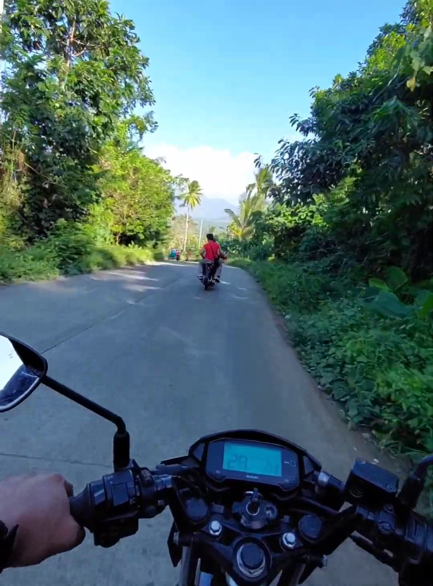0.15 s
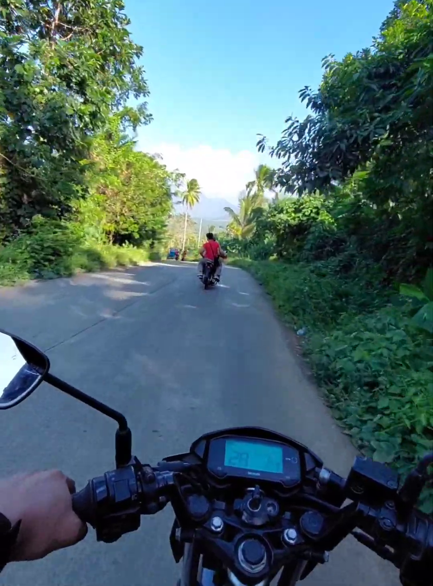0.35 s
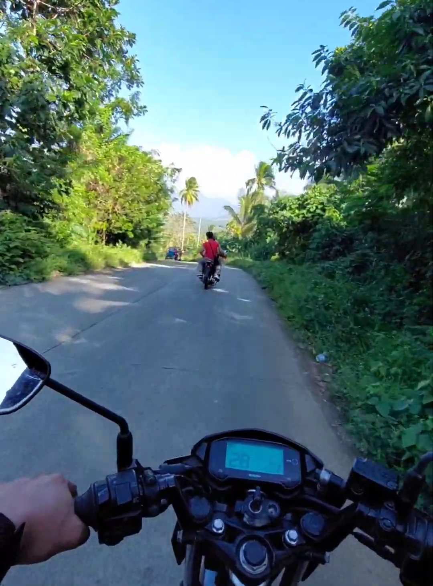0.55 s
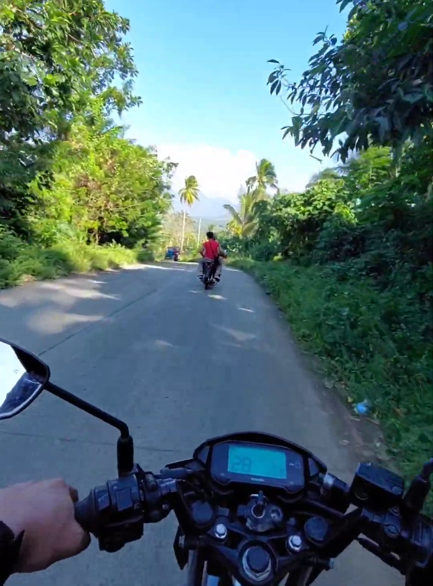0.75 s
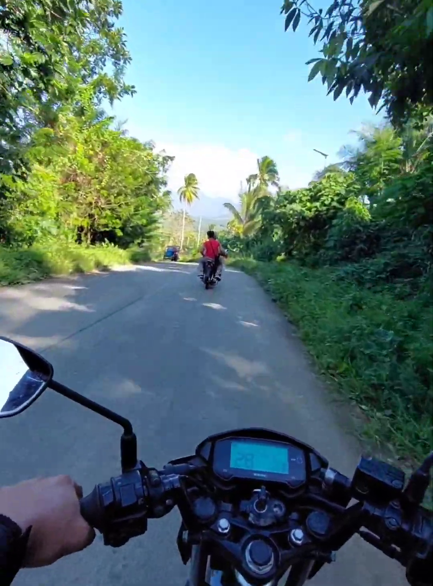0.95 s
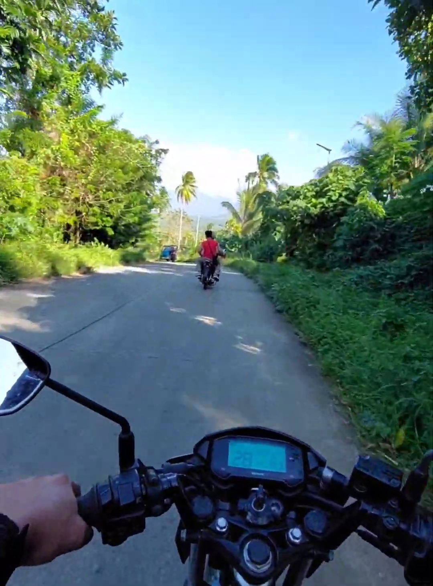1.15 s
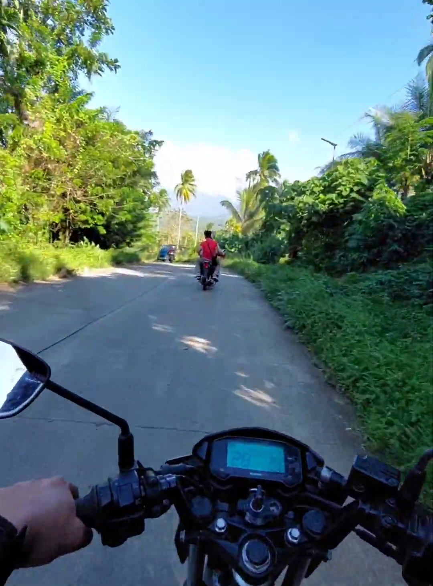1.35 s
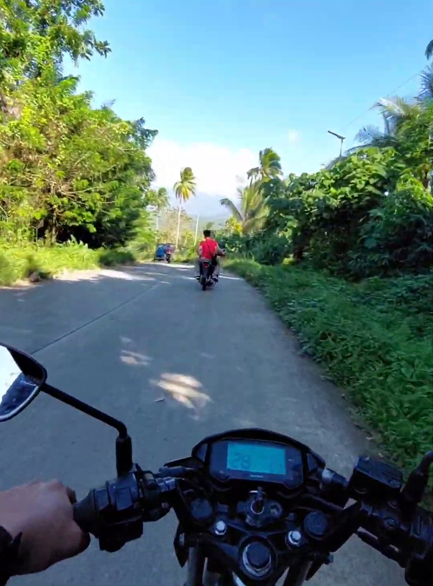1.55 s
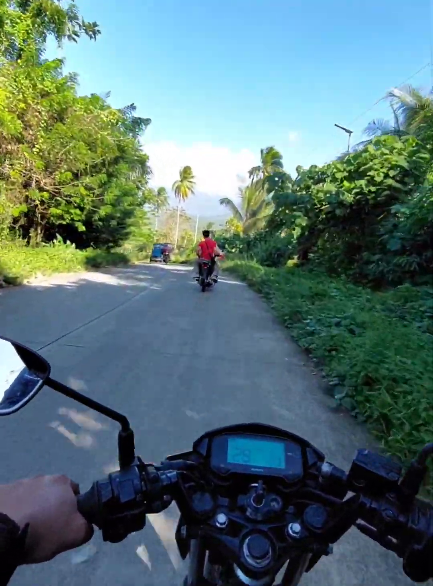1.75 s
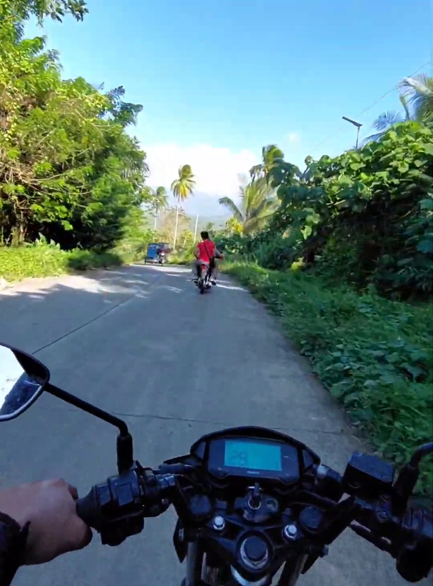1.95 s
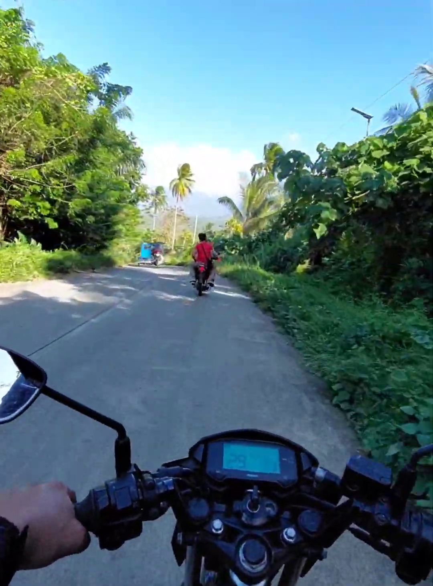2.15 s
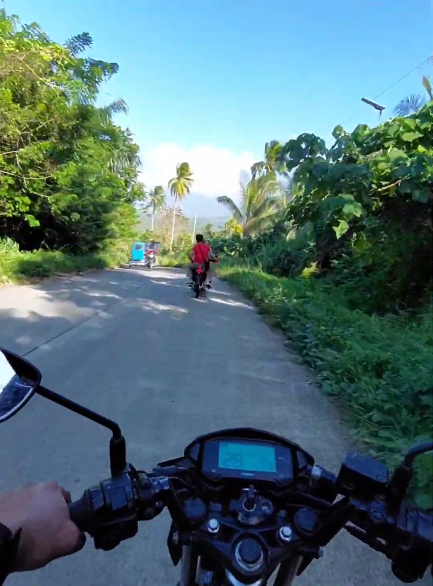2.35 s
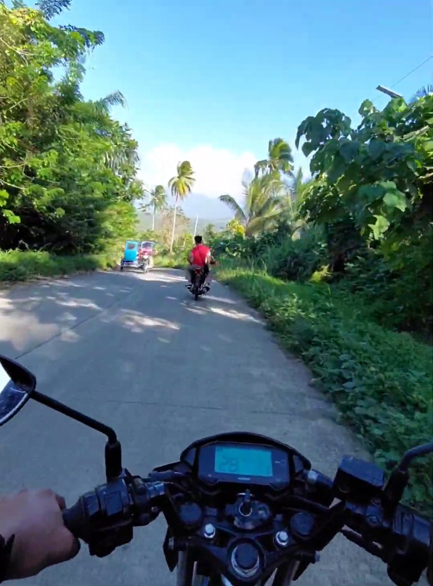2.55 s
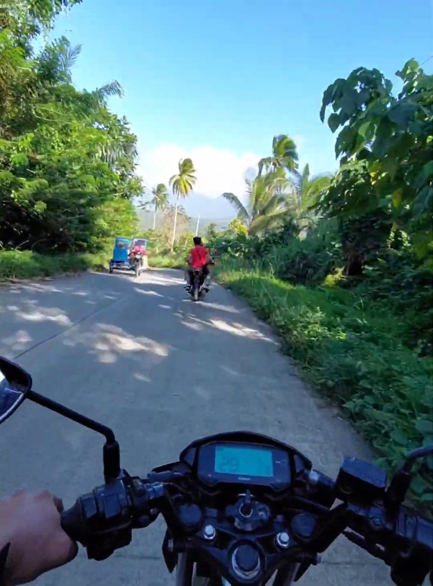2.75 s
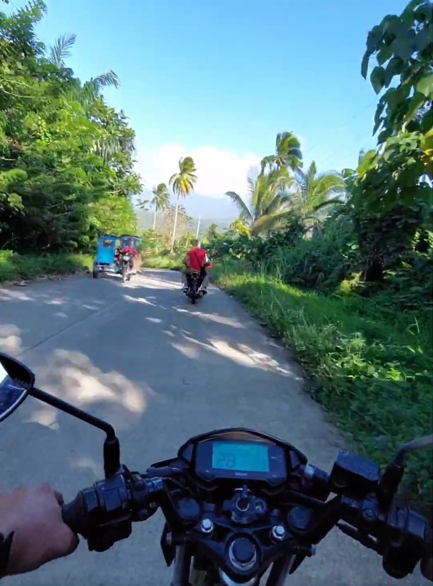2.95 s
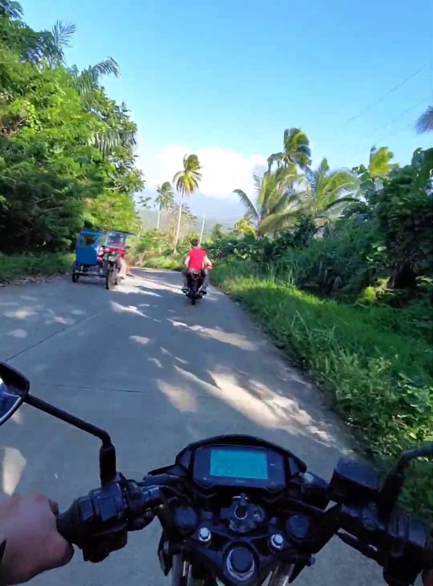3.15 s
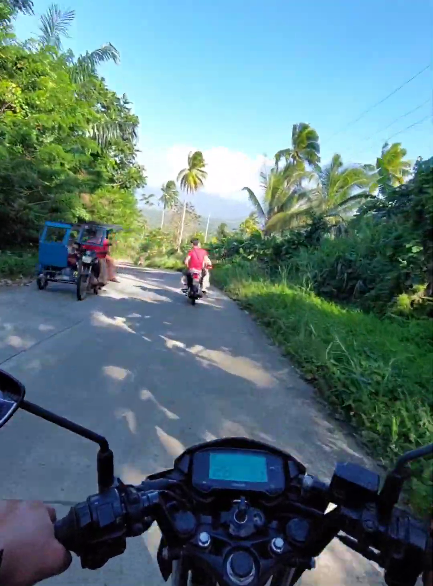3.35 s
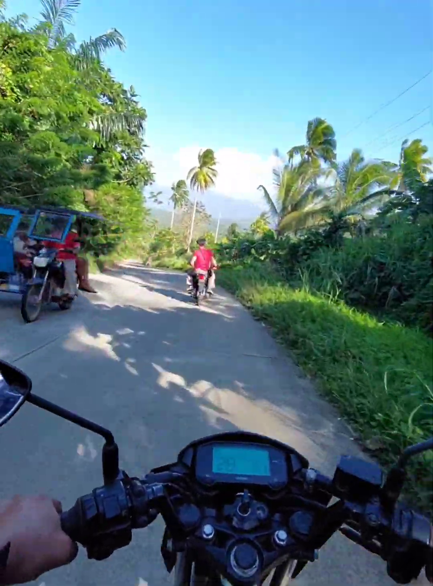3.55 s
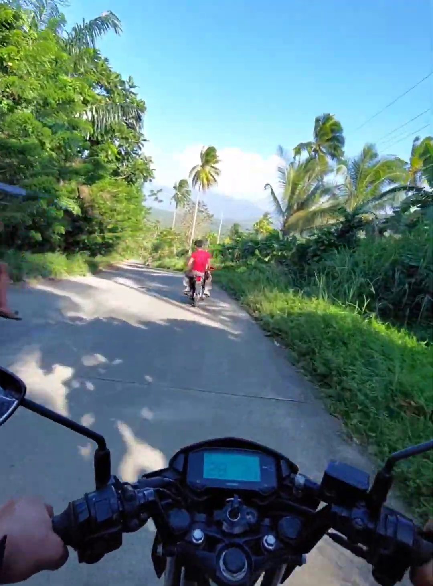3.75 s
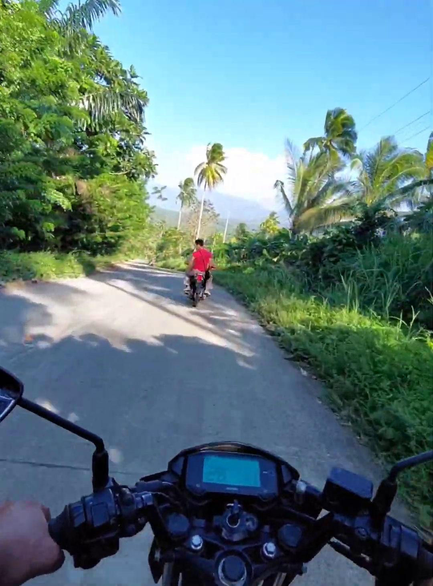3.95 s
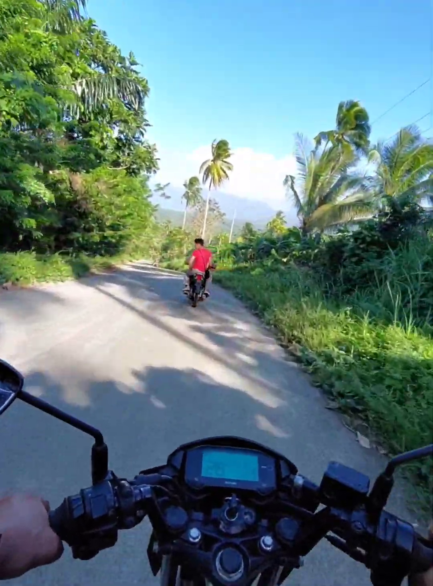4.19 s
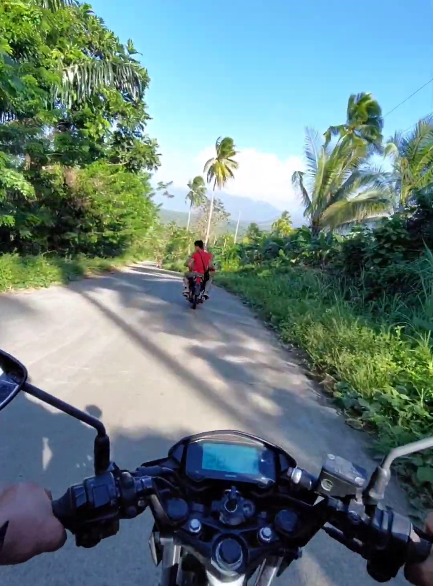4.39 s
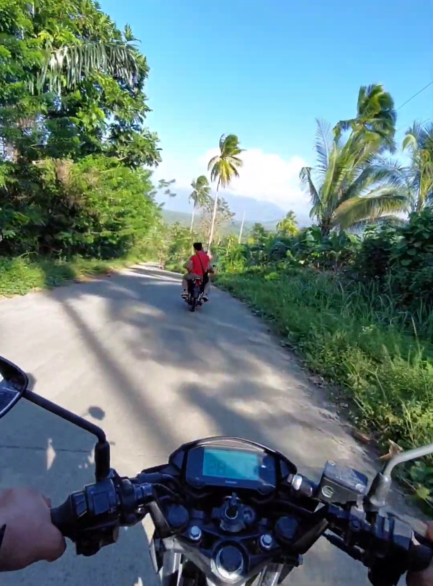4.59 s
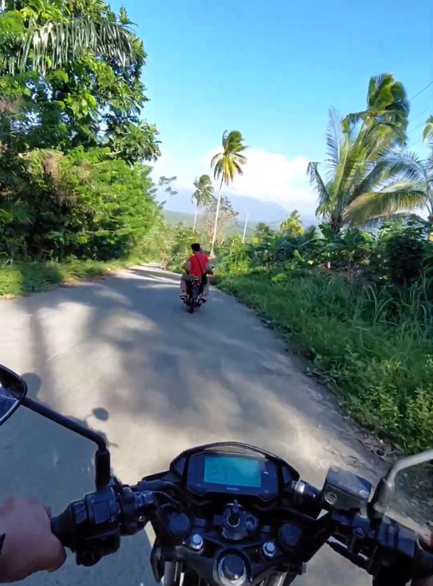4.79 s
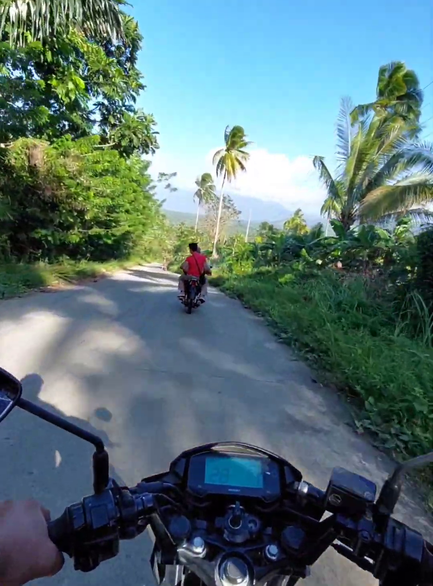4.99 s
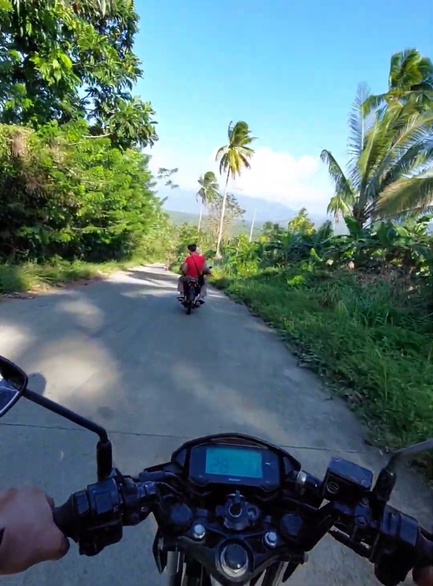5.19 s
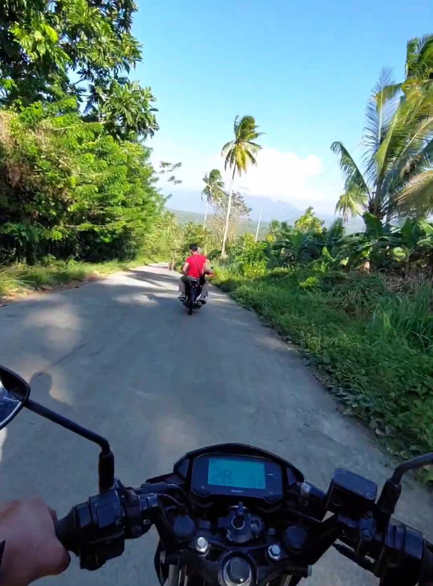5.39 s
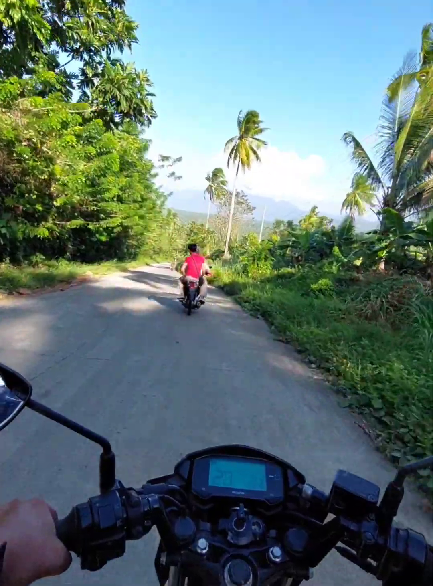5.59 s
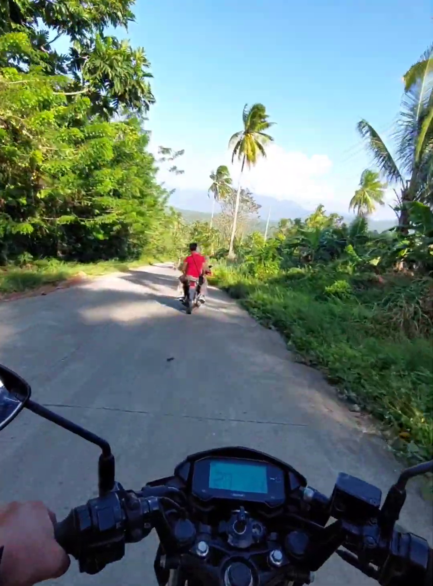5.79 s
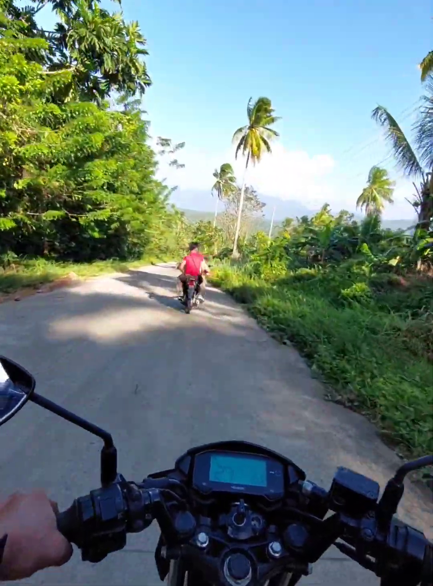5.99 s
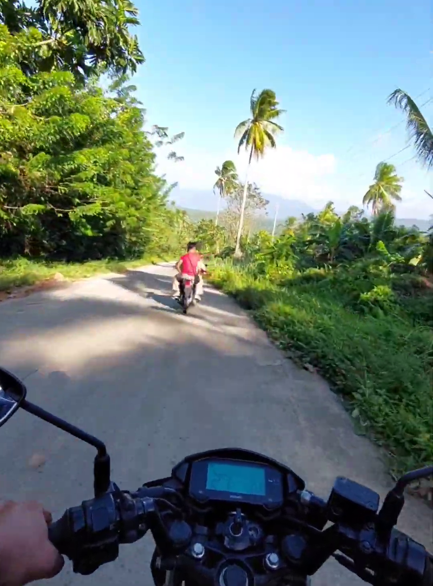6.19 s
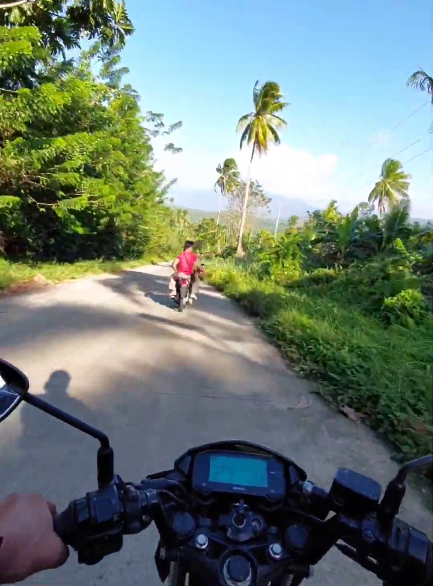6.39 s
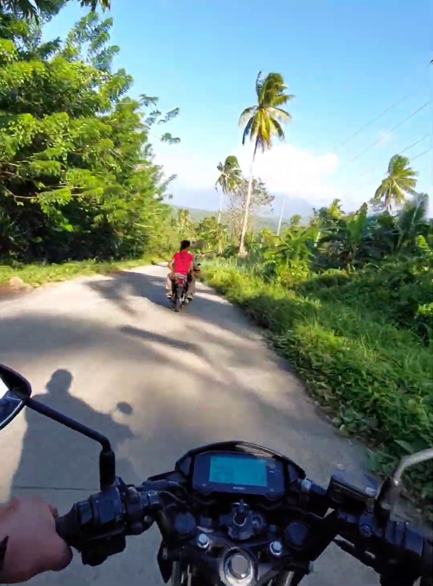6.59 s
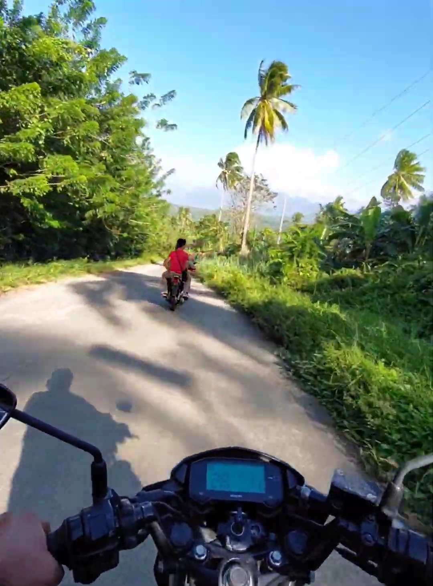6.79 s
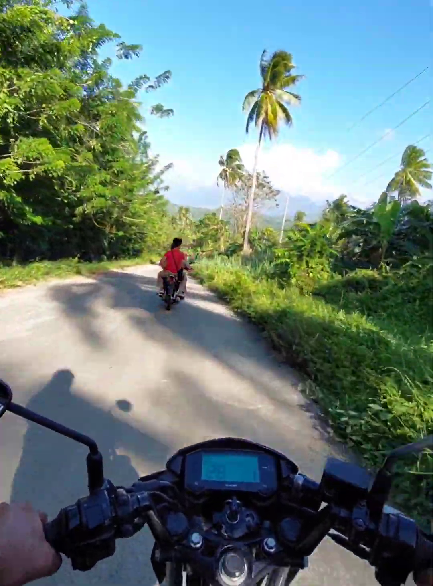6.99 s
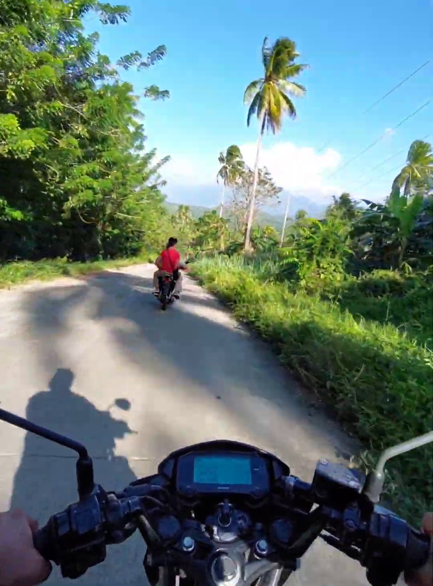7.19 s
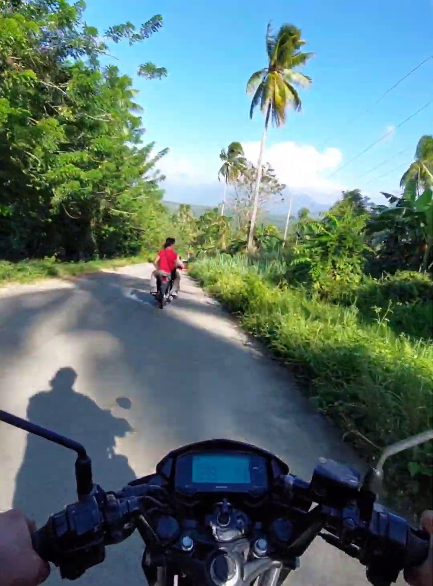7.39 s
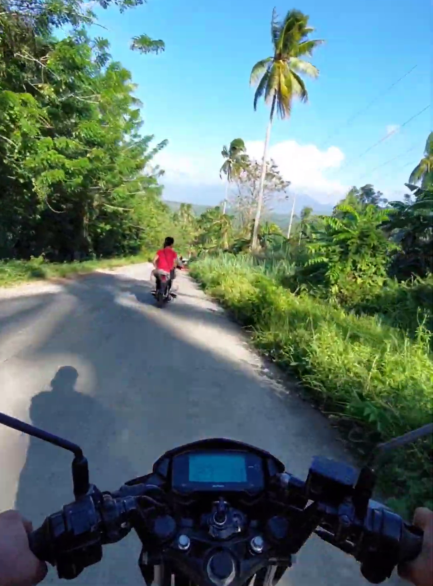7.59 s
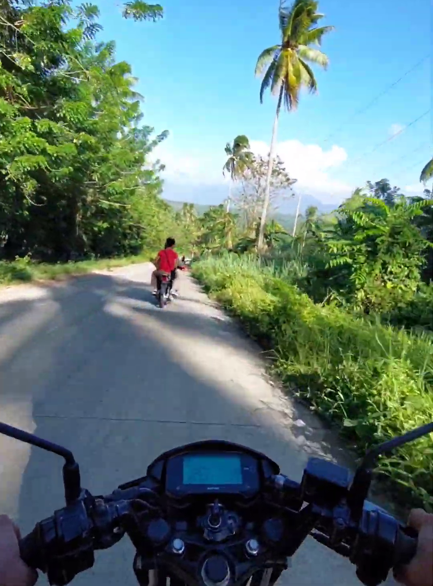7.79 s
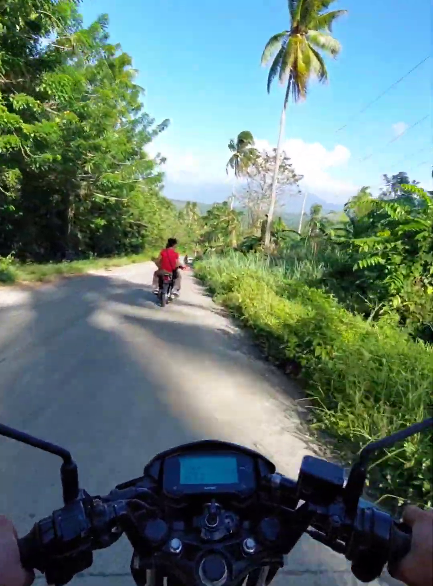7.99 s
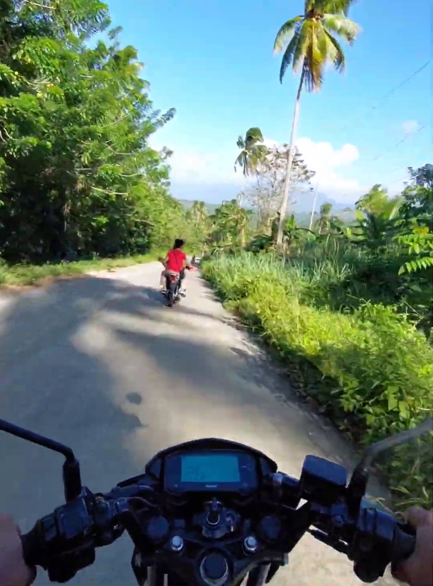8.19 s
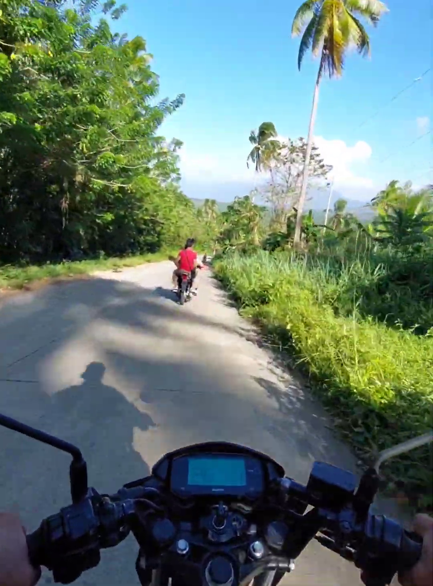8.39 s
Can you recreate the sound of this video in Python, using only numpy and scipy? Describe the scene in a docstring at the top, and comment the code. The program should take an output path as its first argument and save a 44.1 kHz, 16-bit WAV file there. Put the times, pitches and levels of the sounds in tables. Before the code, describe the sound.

A single-cylinder motorcycle rolls along a concrete road at low revs, heard close from the rider's chest. Its exhaust thumps steadily over valve clatter, tyre rumble and hiss, stumbling briefly now and then. Around four seconds in, a motor tricycle drones past the other way with a rasping chain and squeaking sidecar. Afterwards the bike carries on, with rough patches knocking its bodywork and small parts ticking.

```python
"""A single-cylinder motorcycle rolls along a concrete road at low revs, heard from the rider's chest.
Each firing thumps in the silencer, over valve clatter, airbox burble, gear whine, tyre rumble and hiss.
The engine stumbles on the light throttle; rough patches knock the bodywork and small parts tick.
A motor tricycle drones past the other way near four seconds, its chain rasping, its sidecar squeaking."""
import sys
import numpy as np
from scipy import signal
from scipy.fft import rfft, irfft
from scipy.io import wavfile
from scipy.ndimage import uniform_filter1d

SR = 44100
rng = np.random.default_rng(int(sys.argv[2]) if len(sys.argv) > 2 else 0)


def transcribe(signal):
    """Save signal, clipped to [-1, 1], as a 16-bit WAV file at the path in sys.argv[1]."""
    frames = np.atleast_2d(signal).T
    limited = np.clip(frames, -1, 1)
    pcm = np.round(limited * 32767).astype(np.int16)
    wavfile.write(sys.argv[1], SR, pcm)


N = 372195
TIME_S = np.arange(N) / SR
FREQ_HZ = np.arange(N // 2 + 1) * SR / N
PASS_S, CLOSING_M_S, GAP_M = 3.95, 11, 3  # tricycle's straight pass

# Table levels are relative; each source adds its own gain.
# Motorcycle engine speed. Each row: time in seconds, firings per second.
REVS = [(0, 17.108), (1, 17.214), (1.7, 17.372), (2.8, 16.996), (3.4, 16.843), (4.8, 16.71), (6.3, 16.601),
        (7.1, 16.578), (7.6, 16.298), (8.44, 16.437)]
# Engine load. Each row: time in seconds, firing level in dB.
PULL = [(0, -17), (.25, -13.5), (.8, -12.5), (1.4, -13.5), (2.3, -13), (3.3, -15), (4.7, -17.5), (5.7, -16),
        (6.55, -15.5), (7.3, -17.5), (8.44, -17)]
# Resonances of silencer, light steel parts, bodywork. Each row: centre in Hz, width in Hz, level in dB.
EXHAUST_MODES = [(133.5, 85.5, -3), (68.6, 74, -12)]
STEEL_MODES = [(2370, 91, 6), (4200, 99, 11.5), (4850, 130, 9), (5190, 69, -16), (6160, 400, -12),
               (13100, 340, -2)]
BODYWORK_MODES = [(360, 140, 15), (565, 45, 7), (730, 194, 11), (970, 130, -1.5), (1280, 110, -3.5),
                  (1634, 110, -5.5), (2030, 140, -9.5), (2400, 360, -18.5), (3600, 920, -29)]
# Ride noise. Each row: time in seconds, rumble in dB, clatter in dB, hiss in dB.
RIDE = [(0, -29, -43.5, -58), (1.7, -28.5, -42, -54), (2.9, -29, -44.5, -55), (4.7, -32.5, -46.5, -61),
        (5.4, -32, -48, -58), (6.42, -29, -45, -54), (6.55, -26, -48.5, -53.5), (6.68, -30.5, -45.5, -55),
        (7.4, -30, -46.5, -53), (8.44, -29.5, -44, -54)]
# Motorcycle noise spectra. Each row: frequency in Hz, spectral density in dB.
CLATTER_SPECTRUM = [(300, 13), (700, -1.5), (900, 11.5), (1150, 2.5), (1450, 5), (1620, -0.5), (1780, 1.5),
                    (2050, -9), (2500, -0.5), (2900, -8.5), (4000, -10), (8000, -22)]
HISS_SPECTRUM = [(1500, -13), (2800, -9), (3300, 1), (3700, -6), (4300, -1.5), (4900, 4), (5500, 0),
                 (6800, -1.5), (7800, -12), (9300, -29), (11000, -9.5), (12500, -12.5), (15500, -15)]
ROAD_SPECTRUM = [(20, -47), (45, -14), (90, 1), (160, 4), (250, -3.5), (350, -4.5), (430, -8), (540, -9),
                 (630, -13.5), (850, -19.5), (1100, -32.5), (1600, -50), (4000, -60)]
# Airbox as the throttle opens. Each row: time in seconds, level in dB, gulp depth in dB.
THROTTLE = [(0, -44.5, 2), (2.5, -38, 3.5), (5, -43.5, 4.5), (6.5, -38, 4.5), (7.3, -38.5, 0.5),
            (8.44, -34.5, 6)]
# Gear pairs. Each row: tooth meshes per firing, level in dB.
MESHES = [(42.1, 0), (51.3, -6.5)]
# Road bumps. Each row: start in seconds, level in dB, chatter T60 in seconds, tilt in dB per octave.
JOLTS = [(.959, -27, .06, 4), (1.633, -32, .03, 0), (2.015, -28, .03, -1), (2.904, -29, .03, 1),
         (2.937, -29, .05, 6.5), (2.952, -26, .04, 0), (4.778, -30, .03, -1), (4.794, -29, .028, 4),
         (4.808, -28.5, .08, 5), (4.816, -25, .04, -1), (5.169, -26, .03, -4), (5.185, -27, .03, -2),
         (5.314, -33, .1, 6), (5.323, -34, .04, 6), (5.338, -30, .028, -3), (5.354, -27, .025, 1),
         (6.403, -28, .03, -1), (6.511, -23, .05, -1), (6.521, -27, .03, -1), (6.538, -27, .03, 2),
         (6.56, -30, .03, 6), (6.597, -26, .025, 5), (6.608, -27.5, .025, 6), (6.621, -30, .03, 3),
         (6.641, -28, .02, 5), (6.649, -28, .02, 5), (6.666, -35, .03, 6), (6.812, -33, .028, 3),
         (6.9, -31, .03, 1), (6.918, -36, .03, 7), (7.187, -30, .03, 0), (7.273, -22.5, .03, -4),
         (7.359, -31, .03, 0)]
# Misfires. Each row: centre in seconds, depth in dB, half length in seconds.
STUMBLES = [(1.093, 10, 0.046), (1.54, 7, 0.053), (1.968, 16.5, 0.023), (2.198, 15, 0.035), (2.47, 7, 0.04),
            (2.656, 24, 0.062), (2.82, 38, 0.059), (3.016, 30, 0.025), (3.307, 6, 0.021), (3.5, 15, .026),
            (4.89, 15, 0.064), (5.26, 21, 0.026), (5.383, 39, 0.051), (5.548, 4, 0.039), (5.88, 16, 0.021),
            (6.284, 4, 0.1), (6.678, 29, 0.048), (6.895, 9, 0.037), (7.067, 4.5, 0.11), (7.532, 18, 0.029),
            (7.68, 12, 0.039), (8.1, 0, 0.061)]
# Small hard parts. Each row: start in seconds, level in dB, pitch in Hz.
TICKS = [(1.2141, -50, 12500), (1.7614, -45, 7700), (2.3007, -43.5, 8900), (2.48, -44, 6500),
         (2.55, -41, 6500), (3.5389, -38, 12500), (3.8975, -32, 12000), (4.487, -46, 14000),
         (4.578, -44.5, 7700), (4.644, -44, 5800), (4.757, -47, 7000), (5.9204, -50, 11000),
         (6.0616, -50, 12500), (6.791, -47, 13000), (7.1811, -42, 5000), (7.639, -46, 12500),
         (7.6864, -49, 12500), (7.9633, -47, 12000)]
# Tricycle chain rasp. Each row: time in seconds, pitch in Hz, level in dB.
CHAIN_RASP = [(.8, 1435, -63), (1.8, 1457, -52), (2.6, 1434, -44), (3.3, 1474, -57.5), (3.65, 1294, -43),
              (4.3, 1178, -75)]
# Tricycle engine speed. Each row: time in seconds, firings per second.
TRICYCLE_REVS = [(2.6, 37.8), (3.1, 38), (3.4, 38.4), (3.8, 39.3), (4.12, 38.6), (4.3, 37.6), (4.5, 38.3),
                 (4.8, 38.6)]
# Tricycle exhaust note, low to high. Each row: multiple of the firing rate, level in dB.
BOOM_PARTIALS = [(2, -13), (3, 0), (4, -22), (6, -24)]
BARK_PARTIALS = [(4, -1), (5, -3.5), (6, -1), (7, -1.5), (8, -2), (9, -2.5), (10, -8), (11, -11.5),
                 (12, -7.5), (13, -17)]
EDGE_PARTIALS = [(14, -5), (16, -7), (17, -7), (18, 0), (19, -7), (21, -5)]
# Tricycle clatter and hiss. Each row: frequency in Hz, spectral density in dB.
TRICYCLE_CLATTER = [(300, 9.5), (700, 9.5), (830, 8), (1050, 3.5), (1250, 3.5), (1400, -2), (1550, 1.5),
                    (1720, 6), (2050, -23), (2750, -11.5), (5000, -8.5), (8000, -22)]
TRICYCLE_HISS = [(1500, 11.5), (3300, 1.5), (4000, -4), (5000, 1.5), (7000, -3.5), (8200, -5.5), (9700, -9),
                 (11000, -4), (13000, -4), (15500, -10)]
# Sidecar frame. Each row: centre in seconds, pitch in Hz, level in dB, half length in seconds.
SQUEAKS = [(3.35, 3460, -55, .08), (3.495, 3400, -48, 0.05), (3.813, 1900, -43, 0.19),
           (3.84, 3360, -43.5, 0.035), (3.926, 4700, -39, 0.018), (3.954, 2610, -45, 0.02),
           (4.1, 3280, -50, 0.03), (4.182, 2200, -51, 0.1), (4.29, 3200, -54, .05),
           (4.376, 2240, -47.5, 0.036), (4.44, 3150, -53, .05)]


def undb(db):
    """Decibels to gain."""
    return 10 ** (np.asarray(db) / 20)


def curves(table):
    """Each column after the first, interpolated linearly in time."""
    times_s, *columns = np.transpose(table)
    return [np.interp(TIME_S, times_s, column) for column in columns]


def unit(x):
    """Scale to rms 1."""
    return x / np.sqrt(np.mean(x ** 2))


def bell(offset, half_width):
    """Gaussian: 1 at zero offset, 1/e at half_width."""
    return np.exp(-(offset / half_width) ** 2)


def walk(rate_hz):
    """Random steps, smoothed twice; spread near 1."""
    hold = max(int(SR / rate_hz), 2)
    steps = np.repeat(rng.standard_normal(N // hold + 1), hold)
    return 1.52 * uniform_filter1d(uniform_filter1d(steps, hold), hold)[:N]


def colour(x, spectrum):
    """Filter by (Hz, dB) points; rms 1."""
    hz, db = np.transpose(spectrum)
    gain = undb(np.interp(np.log(FREQ_HZ + 1), np.log(hz), db))
    return unit(irfft(rfft(x) * gain, N))


def resonate(x, hz, width_hz):
    """Two-pole resonance, gain 1 at centre."""
    return signal.lfilter(*signal.iirpeak(hz, hz / width_hz, fs=SR), x)


def band(x, hz, width_hz):
    """Two resonances in series, the second twice as wide."""
    return resonate(resonate(x, hz, width_hz), hz, 2 * width_hz)


def noise(correlation, left_lag_s=0):
    """Partly correlated stereo white noise."""
    mid, side = rng.standard_normal((2, N))
    mid, side = mid * np.sqrt((1 + correlation) / 2), side * np.sqrt((1 - correlation) / 2)
    return np.array([np.roll(mid + side, round(left_lag_s * SR)), mid - side])


def waver(hz, width_hz):
    """Narrow noise around a fixed or moving pitch."""
    angle = 2 * np.pi * np.cumsum(hz + np.zeros(N)) / SR
    return unit(walk(width_hz) * np.cos(angle) + walk(width_hz) * np.sin(angle))


def clicks(per_s, spread_db):
    """Sparse stereo impulses of uneven size."""
    hit = rng.random(N) < per_s / SR
    size = undb(spread_db * np.minimum(rng.exponential(size=N), 3.5))
    return hit * size * noise(0.66)


def throb(cycles, depth_db):
    """Level swing in dB, peaking a quarter into each engine cycle."""
    return depth_db * np.cos(2 * np.pi * (cycles - .25))


def exhaust(cycles, force_db, echo_s=.01448, echo_db=-3.5, scatter_db=1.46, detune=.064):
    """Each firing swells and dies in the silencer and echoes once along the pipe, with a turbulent puff."""
    phase = cycles + .062
    firings_s = TIME_S[np.flatnonzero(np.diff(np.floor(phase)) > 0)]
    age_s = TIME_S[:SR // 16]
    thumps = np.zeros(N + SR)
    for due_s in firings_s:
        direct_s = rng.normal(due_s, .002)
        return_s = direct_s + rng.normal(echo_s, .0012)
        for start_s, path_db in [(direct_s, 0), (return_s, echo_db)]:
            start = max(int(start_s * SR), 0)
            for hz, width_hz, db in EXHAUST_MODES:
                rise = np.pi * width_hz * age_s / 3
                swell = (rise * np.exp(1 - rise)) ** 3
                gain = undb(rng.normal(db + path_db, scatter_db))
                tone = np.cos(2 * np.pi * hz * rng.normal(1, detune) * age_s)
                thumps[start:start + len(age_s)] += gain * swell * tone
    puff = bell((phase - .29 + .5) % 1 - .5, .25)  # peaks .29 cycle after firing
    gas = colour(noise(.48), [(25, -43), (50, 6), (90, 2.5), (135, 3), (220, -12), (370, -13),
                              (550, -39), (1000, -59)])
    return undb(force_db) * (undb(2.5) * thumps[:N] + undb(-13) * puff * gas)


def machinery(cycles, clatter_db, hiss_db, grain_db=2.5):
    """Valve gear and chain clatter twice per firing, off to the right; tyres and chain hiss above."""
    taps_db = -.3 * np.cos(4 * np.pi * cycles)
    clatter = noise(.3, .00041) * undb(taps_db + grain_db * walk(250))
    hiss = (noise(.49) + noise(.28, .00041)) * undb(.5 * taps_db + grain_db * walk(300))
    return (undb(clatter_db + 5) * colour(clatter, CLATTER_SPECTRUM)
            + undb(hiss_db + 2) * colour(hiss, HISS_SPECTRUM))


def airbox(cycles, stumble_db, hz=345, width_hz=140, uneven_db=3):
    """Intake air burbles in the airbox, with a gulp per firing."""
    throttle_db, gulp_db = curves(THROTTLE)
    flow = noise(.89) * undb(throb(cycles, gulp_db) + .29 * stumble_db + uneven_db * walk(70))
    return undb(throttle_db) * unit(band(flow, hz, width_hz))


def gears(firing_hz, pull_db, stumble_db, whine_db=-42, slack_s=.47):
    """Meshing teeth whine under load, quieter as the engine eases or stumbles."""
    load_db = 1.58 * (pull_db - pull_db.max()) + .5 * uniform_filter1d(stumble_db, int(slack_s * SR))
    whine = sum(undb(db) * waver(teeth * firing_hz, width_hz=60) for teeth, db in MESHES)
    return undb(whine_db + load_db) * whine


def road(cycles, rumble_db, stumble_db, uneven_db=1.24, shake_below_hz=300):
    """Tyres and air rumble; the lows pulse as the engine shakes the frame."""
    tyres = colour(noise(.8), ROAD_SPECTRUM)
    eddies = colour(noise(.77, .0005), [
        (20, -27), (45, -10), (70, 5), (130, 8.5), (240, -2), (350, .5), (540, -4.5), (630, -7),
        (850, -8.5), (1100, -15), (2500, -32), (6000, -43.5)])
    rumble = undb(2.24) * tyres + eddies
    lows = signal.sosfiltfilt(signal.butter(2, shake_below_hz, fs=SR, output="sos"), rumble)
    shake_db = throb(cycles, depth_db=4.2) + .052 * stumble_db
    return undb(rumble_db + uneven_db * walk(60)) * (rumble + (undb(shake_db) - 1) * lows)


def debris(rumble_db, hiss_db):
    """Air buffets pop against the rider; grit flicks off the tyres; light steel parts clink."""
    buffets = colour(clicks(per_s=50, spread_db=2.5), [
        (60, -9), (200, 8.5), (450, -1.5), (800, -19), (1400, -17), (3000, -58)])
    grit = colour(clicks(per_s=70, spread_db=5), [
        (800, -20), (1600, -8), (3000, -5), (5000, -5), (7200, -3), (9200, -14), (12000, -6), (15500, 9)])
    taps = clicks(per_s=220, spread_db=2.2)
    clinks = unit(sum(undb(db) * resonate(taps, hz, width_hz) for hz, width_hz, db in STEEL_MODES))
    return undb(rumble_db - 9) * buffets + undb(hiss_db - 13) * grit + undb(hiss_db - 5) * clinks


def knocks(chatter_db=-24, detune=.05, left_lag_s=.0001):
    """Each bump strikes the bodywork and leaves it chattering; harder contact favours higher modes."""
    out = np.zeros((2, N + SR))
    age_s = TIME_S[:SR // 8]
    lowest_hz = BODYWORK_MODES[0][0]
    for start_s, db, t60_s, tilt_db_per_octave in JOLTS:
        blow = undb(chatter_db - 60 * age_s / t60_s) * rng.standard_normal((2, len(age_s)))
        blow[0, int(left_lag_s * SR)] += 1
        blow[1, 0] += 1
        clunk = 0
        for centre_hz, width_hz, mode_db in BODYWORK_MODES:
            hz = centre_hz * (1 + detune * rng.uniform(-1.13, 1))
            gain = undb(mode_db + tilt_db_per_octave * np.log2(hz / lowest_hz))
            clunk = clunk + gain * band(blow, hz, width_hz)
        attack_rms = np.sqrt(np.mean(clunk[:, :SR // 200] ** 2))
        start = int(start_s * SR)
        out[:, start:start + len(age_s)] += undb(db - 1) * clunk / attack_rms
    return out[:, :N]


def stumbles(rebound_db=3, rebound_s=.037):
    """Firing level change in dB: a misfire drops it, then unburnt mixture strengthens the next firing."""
    db = np.zeros(N)
    for centre_s, depth_db, half_s in STUMBLES:
        db -= depth_db * bell(TIME_S - centre_s, half_s)
        db += rebound_db * bell(TIME_S - centre_s - 2 * half_s, rebound_s)
    return db


def ticks(t60_s=.013):
    """Small hard parts tick, high and thin, each at its own pitch."""
    out = np.zeros((2, N))
    contact = noise(.35)
    for start_s, db, hz in TICKS:
        span = slice(int(start_s * SR), int(start_s * SR) + SR // 20)
        tone = unit(band(contact[:, span], hz, .3 * hz))
        out[:, span] += tone * undb(db + 2.5 - 60 * (TIME_S[span] - start_s) / t60_s)
    return out


def bearing(late_s=0):
    """Tricycle distance in metres, and facing: 1 coming, -1 going."""
    along_m = CLOSING_M_S * (TIME_S - PASS_S - late_s)
    distance_m = np.hypot(along_m, GAP_M)
    return distance_m, -along_m / distance_m


def passing(level_db, ahead_db, carry_m, late_s=0):
    """Gain of a part aimed forward or back: falls with distance, dies out beyond carry_m."""
    distance_m, facing = bearing(late_s)
    return GAP_M / distance_m * undb(level_db + ahead_db * facing) * bell(distance_m, carry_m)


def alongside(peak_db, focus, late_s=0):
    """Gain of a part that radiates sideways: peaks abreast of the rider."""
    distance_m, _ = bearing(late_s)
    return undb(peak_db) * (GAP_M / distance_m) ** focus


def doppler(x, shift=.035):
    """Pitch up on approach, down on retreat."""
    _, facing = bearing()
    clock = np.cumsum(1 + shift * facing)
    return np.array([np.interp(clock, np.arange(N), channel) for channel in x])


def chain(width_hz=230):
    """The tricycle's chain rasps on its sprockets; roller sizzle carries only at close range."""
    hz, db = curves(CHAIN_RASP)
    rasp = np.array([waver(hz, width_hz) for _ in range(2)])
    sizzle = np.array([waver(5800, 2200) + undb(-10) * waver(12250, 1500) for _ in range(2)])
    return undb(db) * rasp + sizzle * passing(-47, ahead_db=3, carry_m=5.6, late_s=-.46)


def partials(table, angle, flutter_db, drift_rad=.012):
    """Firing-rate harmonics; each flutters and drifts in phase between channels."""
    out = 0
    for k, db in table:
        spread_rad = drift_rad * k * np.array([[1], [-1]]) * walk(3.1)
        gain = undb(db + flutter_db * walk(12))
        out = out + gain * np.cos(k * angle + rng.uniform(0, 2 * np.pi) + spread_rad)
    return out


def boom(angle, shut_s=4.82, shut_db=-7):
    """The tricycle's tailpipe booms rearward, dropping as the driver shuts the throttle."""
    note = unit(sum(undb(db) * np.cos(k * angle) for k, db in BOOM_PARTIALS))
    throttle = undb(np.interp(TIME_S, [shut_s - .02, shut_s + .02], [0, shut_db]))
    return note * throttle * passing(-16, ahead_db=-3, carry_m=15, late_s=.0089)


def bark(firing_hz, angle, lift_db=8, lift_hz=276, slide_hz_per_s=83, rough_db=2.2):
    """The tricycle's uneven forward bark; road reflection lifts a band that slides down as it passes."""
    centre_hz = lift_hz - slide_hz_per_s * np.clip(TIME_S - PASS_S, -.5, .5)
    lifted = [(k, db + lift_db * bell(k * firing_hz - centre_hz, 40)) for k, db in BARK_PARTIALS]
    note = partials(lifted, angle, flutter_db=1.5) * undb(rough_db * walk(60))
    return note * passing(-30, ahead_db=3, carry_m=14, late_s=-.04)


def tricycle_engine():
    """A faster single: boom, bark and pulsing clatter; a brassy edge and hiss alongside."""
    firing_hz, = curves(TRICYCLE_REVS)
    angle = 2 * np.pi * np.cumsum(firing_hz * (1 + .008 * walk(40))) / SR
    drone = boom(angle) + bark(firing_hz, angle)
    clatter = doppler(colour(noise(.81) * undb(2 * np.cos(angle)), TRICYCLE_CLATTER))
    hiss = colour(noise(.27, .0003) * undb(1.3 * walk(360) + 1.5 * walk(45)), TRICYCLE_HISS)
    edge = partials(EDGE_PARTIALS, angle, flutter_db=2.5)
    return (drone + clatter * passing(-37.5, ahead_db=8.5, carry_m=42, late_s=.044)
            + hiss * alongside(-34.5, focus=2.2)
            + edge * alongside(-35.5, focus=2.8, late_s=-.045))


def squeal(centre_hz=3320, shift=.04, width_hz=330, catch_db=3.5):
    """A rubbing part on the tricycle catches and slips; its pitch drops as it passes."""
    _, facing = bearing()
    rub = np.array([waver(centre_hz * (1 + shift * facing), width_hz) for _ in range(2)])
    return rub * undb(catch_db * walk(29.98)) * passing(-48, ahead_db=3, carry_m=10.5)


def squeaks(width_hz=280):
    """Loose steel rubs and rings at each shake of the sidecar."""
    out = np.zeros((2, N))
    rub = noise(.71)
    for centre_s, hz, db, half_s in SQUEAKS:
        span = slice(int((centre_s - .2) * SR), int((centre_s + .2) * SR))
        tone = unit(band(rub[:, span], hz, width_hz))
        out[:, span] += undb(db - 1) * bell(TIME_S[span] - centre_s, half_s) * tone
    return out


def rattle(decay_s=.0011):
    """The tricycle's loose fittings shed a shower of tiny metallic clicks."""
    hits = abs(clicks(per_s=260, spread_db=3))
    envelope = signal.lfilter([1], [1, -np.exp(-1 / (SR * decay_s))], hits)
    metal = colour(envelope * noise(.2), [
        (1200, -20), (2500, 2), (4700, 4), (7000, 0), (9000, -8), (12500, -2), (15500, 3.5)])
    return metal * alongside(-43, focus=2.8, late_s=-.02)


def scene():
    """The ridden bike, the road under it and the passing tricycle."""
    firing_hz, = curves(REVS)
    pull_db, = curves(PULL)
    rumble_db, clatter_db, hiss_db = curves(RIDE)
    cycles = np.cumsum(firing_hz) / SR + .3092
    stumble_db = stumbles()
    bike = exhaust(cycles, pull_db + stumble_db) + machinery(cycles, clatter_db, hiss_db)
    bike += airbox(cycles, stumble_db) + gears(firing_hz, pull_db, stumble_db) + knocks() + ticks()
    rolling = road(cycles, rumble_db, stumble_db) + debris(rumble_db, hiss_db)
    tricycle = tricycle_engine() + rattle() + squeal() + squeaks() + chain()
    return bike + rolling + tricycle


def record(dry, right_bias_db=.9, top_hz=15750):
    """Right channel slightly more sensitive; steep low-pass."""
    balanced = dry * undb(np.array([[-right_bias_db], [right_bias_db]]) / 2)
    return signal.sosfilt(signal.ellip(12, .1, 80, top_hz, fs=SR, output="sos"), balanced)


dry = scene()
out = record(dry)
transcribe(out)
```